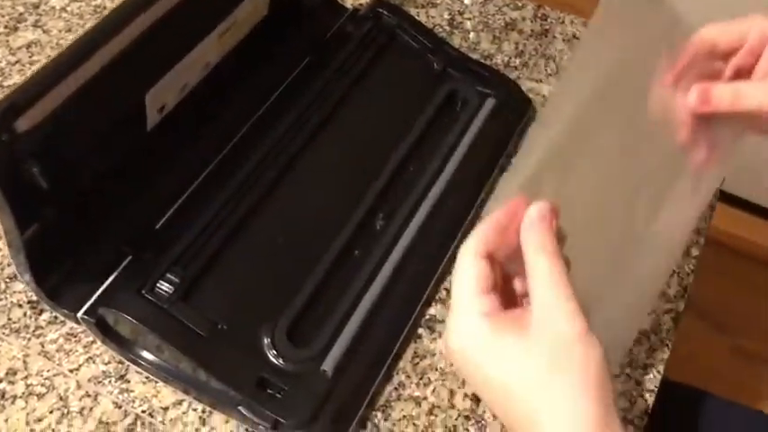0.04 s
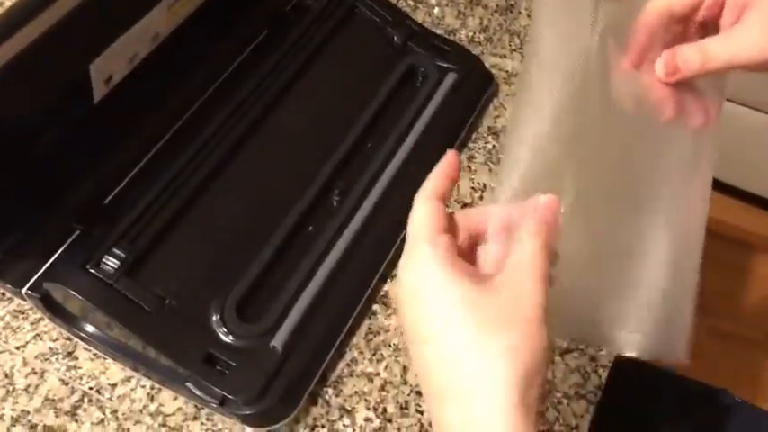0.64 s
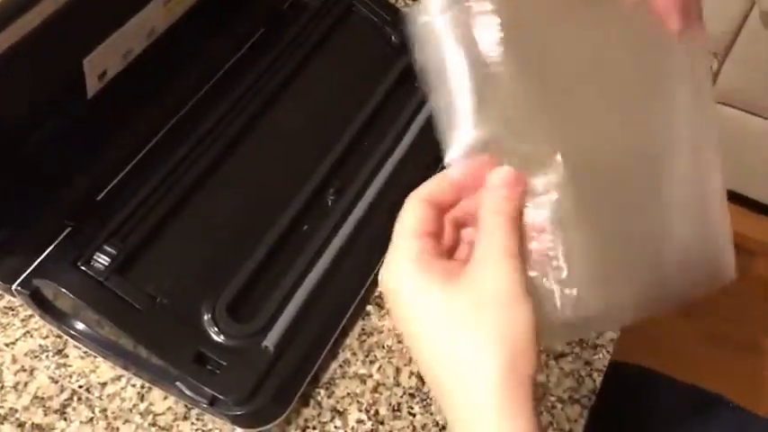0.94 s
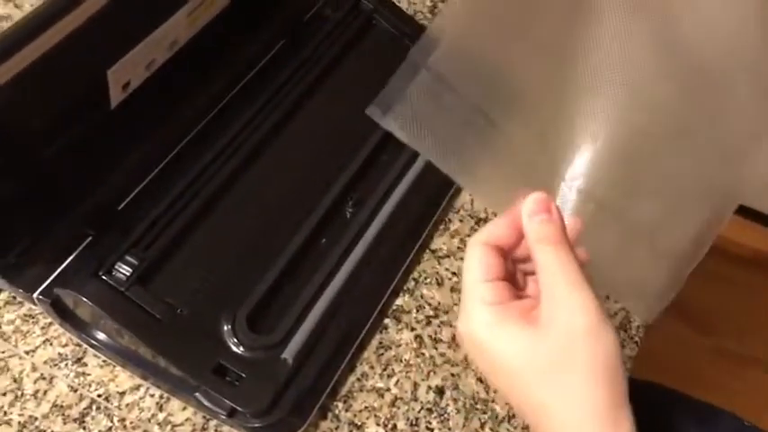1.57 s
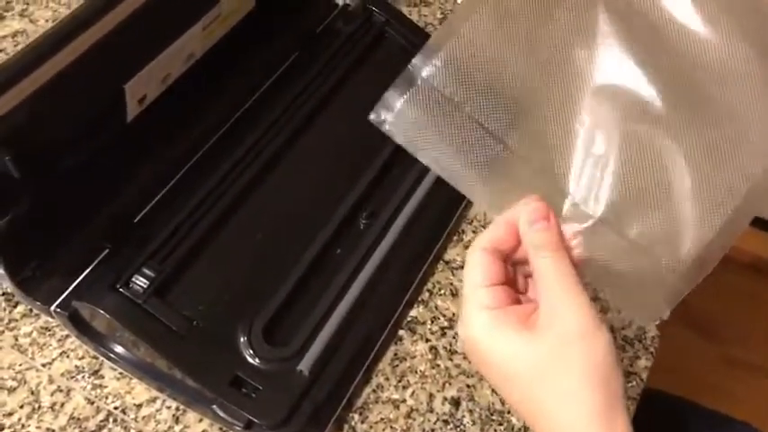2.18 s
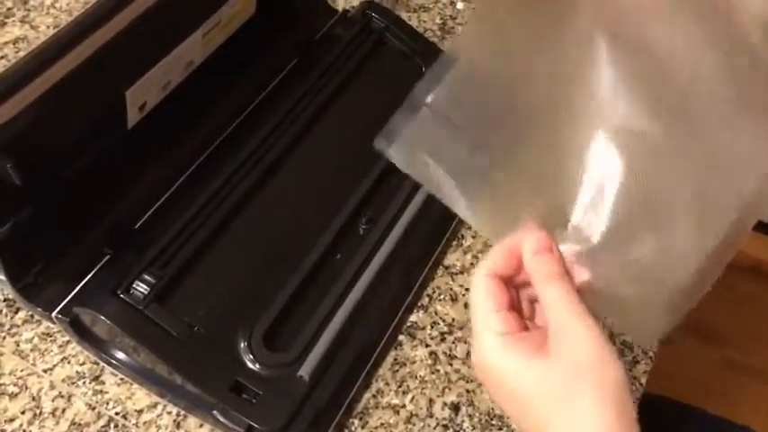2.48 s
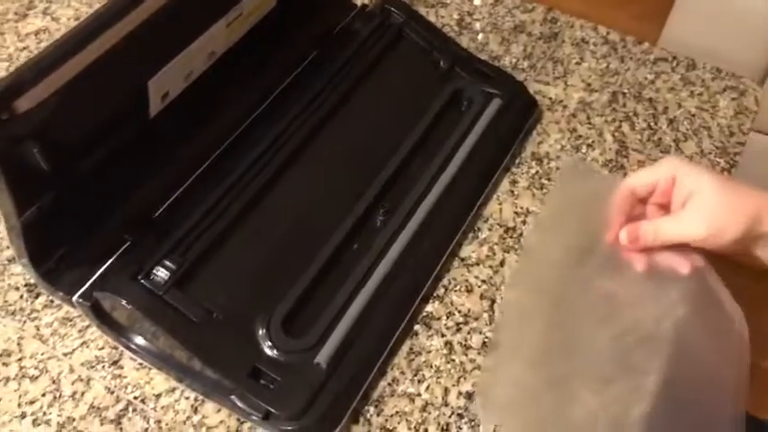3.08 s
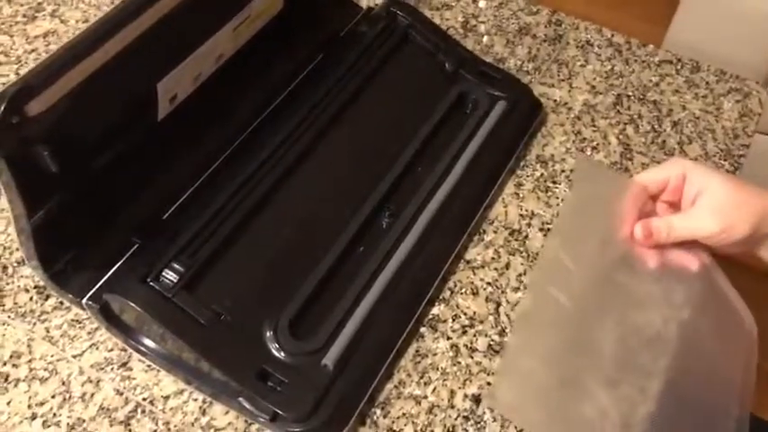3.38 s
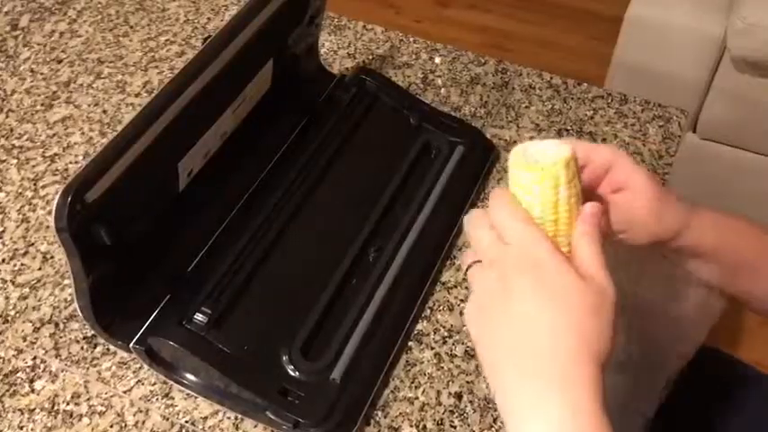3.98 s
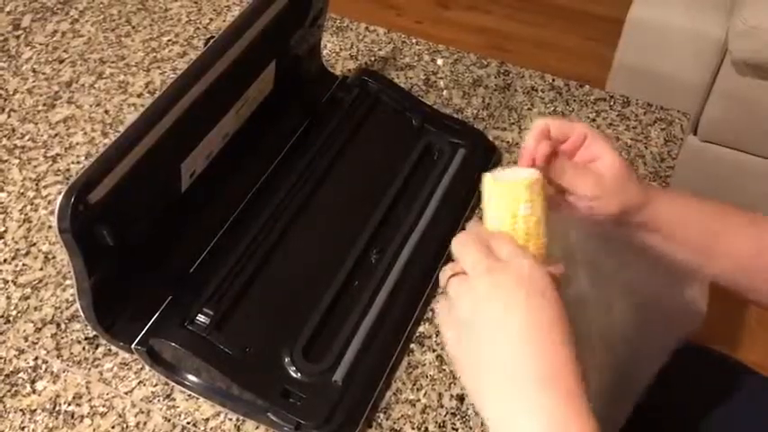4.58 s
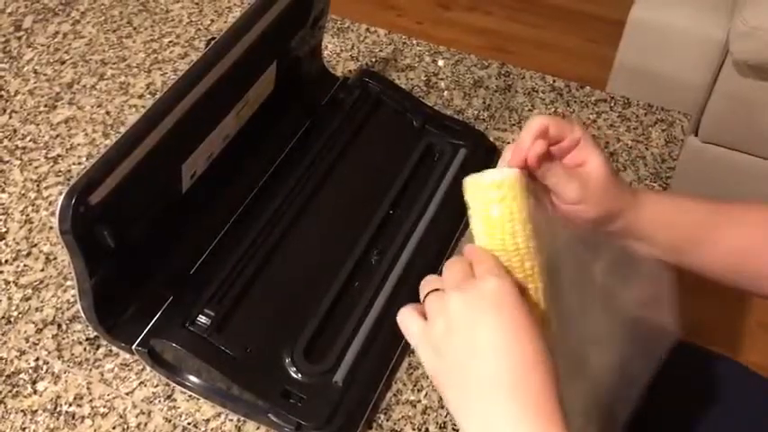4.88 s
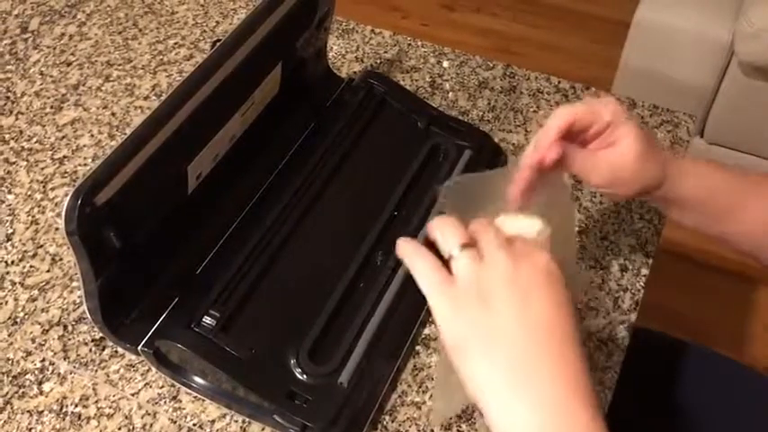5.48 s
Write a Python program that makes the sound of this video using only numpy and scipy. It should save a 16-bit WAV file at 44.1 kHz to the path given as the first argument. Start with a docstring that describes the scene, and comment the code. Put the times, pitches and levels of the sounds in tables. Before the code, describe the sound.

In a small, quiet kitchen, stiff plastic crackles softly nearby as fingers rub and bend a bag. Its creases pop sharply at uneven intervals. The bag drops on the counter with a light slap and a short skid, and there is a moment of faint room noise. Then it is picked up and a corn cob is pushed in, bringing denser rustling, brief scrapes and the loudest snaps near the end.

```python
"""Plastic bag and corn cob

Hands turn and open a stiff plastic bag over a stone kitchen counter, drop it, pick it up and push a
corn cob in. Creases snap through and send short bending waves across the film; between snaps it rubs
and crackles finely. The dropped bag slaps down, skids and flops twice; later the cob scrapes along it.
A small, quiet kitchen rings behind it all."""
import sys
import numpy as np
from scipy import signal
from scipy.fft import rfft, irfft
from scipy.io import wavfile

SR = 44100
rng = np.random.default_rng(int(sys.argv[2]) if len(sys.argv) > 2 else 0)


def dump_mix(stems):
    """Bounce the given channels to the path in sys.argv[1] as a 16-bit WAV at rate SR."""
    frames = np.atleast_2d(stems).T  # one column per channel
    limited = np.clip(frames, -1, 1)  # hard clip at full scale
    pcm = np.round(limited * 32767).astype(np.int16)
    wavfile.write(sys.argv[1], SR, pcm)


N = 244314

# Creases snapping through: t/s, level/dB, f/Hz, roll-off below f and above f/(dB/octave).
# A negative roll-off is a boost.
CREASE_SNAPS = [(.58, -52, 4070, -1.5, -3), (0.86, -52, 1180, -2, 13), (0.947, -45, 556, -3, 7.5),
                (0.9722, -40.5, 3500, 7, 12), (1.1994, -46, 1150, 2, 1.5), (1.227, -42, 4600, 0.5, 36),
                (1.246, -51, 3500, -2, 18), (1.281, -33.5, 9020, 1.6, -6.5), (1.348, -38, 4850, 2.5, 11.5),
                (1.452, -42.5, 6090, 1.5, 15), (1.5552, -41, 2606, 2.5, 1), (1.9169, -41.5, 11200, -2, -30),
                (1.9916, -38, 5940, 2.5, 5), (2.082, -54, 5900, -0.5, 1), (2.145, -43.5, 1180, -2.5, 2.5),
                (2.1613, -45.5, 3100, 6.5, 6), (2.1825, -39.5, 1078, 0.5, 3.5), (2.209, -50, 2400, 2, 5),
                (2.2739, -44, 5500, 0.5, 1.5), (2.2922, -49, 2400, 1.5, 11), (2.31, -46, 4100, -1.5, 9),
                (2.4263, -47, 1750, 3, 10), (2.4668, -41.5, 2600, 3, 5.5), (2.5413, -39.5, 1720, 5.5, 3.5),
                (2.758, -50, 710, 0, 0.5), (2.77, -41, 646, -2, -.5), (2.838, -30, 4600, 1, 6),
                (2.9399, -37, 1710, 3, -2), (3.665, -43, 2944, 2, 10), (3.693, -43, 5400, -1.5, 18),
                (3.8398, -31, 3380, 0.5, 10), (3.9556, -39.5, 2510, 3.5, 8), (4.0804, -42, 2000, 1, -2),
                (4.0868, -41.5, 4070, 6, 18), (4.1225, -41.5, 3670, 7, 1), (4.2539, -46, 3460, 5, 24),
                (4.2844, -44, 4570, 17, 29.5), (4.4266, -30.5, 5470, 8, -2.5), (4.583, -36, 1710, 2, -2.5),
                (4.593, -37.5, 1200, -0.5, 11), (4.6017, -28.5, 5570, 0.5, 16), (4.7083, -28.5, 2100, 5, 0),
                (4.75, -27, 2560, 5, 2.5), (4.9774, -29, 13900, 3.5, 2), (5.0331, -23.3, 2050, 3.5, 1.5),
                (5.0614, -29, 3620, 6, 15), (5.098, -34.5, 1187, 11, 4.5), (5.12, -38.5, 3990, 0.5, 13),
                (5.135, -33.5, 1470, 5, 7), (5.145, -37, 7600, 1, 18.5), (5.202, -47.5, 5420, 3.5, 15),
                (5.3088, -25.5, 1830, 10.5, -2.5), (5.496, -34.5, 2100, -1.5, -3)]
# Overall tone colour shared by snaps and rustle: f/Hz, level/dB
TONE_COLOUR = [(100, -2), (600, -2), (2200, 0), (4200, -3.5), (4900, -5), (5900, -3), (7500, -8),
               (8500, -5.5), (10300, -11.5), (11900, -10.5), (15500, -13.5)]
SNAP_S = .0045  # a snap or tap has the energy of its level held this long
RING_SIZE = 2 ** 11  # samples in one panel's ring
SPURTS_PER_S = 60  # pace of the flutter in the rustle


def snaps(ring_s=0.0022, scatter=0.14, rebound=0.71, rebound_s=0.00092):
    """Creases buckle and ring their panels. Returns the sound straight ahead and the all-round mean."""
    ahead, around = np.zeros((2, N))
    t = np.arange(RING_SIZE) / SR
    for s, db, hz, below, above in CREASE_SNAPS:
        lag_s = rng.uniform(.0006, .0015)
        ring = panel(hz, below, above, lag_s)
        # the wave scatters among wrinkles, longer in large low panels, and an echo off the counter follows just
        # after
        decay_s = ring_s * (2500 / hz) ** 0.052
        kick = scatter * rng.standard_normal(len(t)) * np.exp(-t / decay_s)
        kick[0] += 1
        kick[int((.5 + rng.random()) * rebound_s * SR)] -= rebound
        for out, spectrum in (ahead, ring * rfft(kick)), (around, ring):
            wave = band(irfft(spectrum), 70, 16400)
            add(out, s - lag_s / 2, hit_at_level(wave, db))
    return ahead, around


def panel(hz, below, above, lag_s, tautness=0.73, peak_db=6, peak_octaves=0.38):
    """Spectrum of one buckle: a patch of film rings at hz and its bending waves run out to the edge."""
    f = np.maximum(np.arange(RING_SIZE // 2 + 1) * SR / RING_SIZE, 20)
    octaves = np.log2(f / hz)
    slopes = below * np.minimum(octaves, 0) - above * np.maximum(octaves, 0)
    # a taut panel, thin in the bass, holds a note; a slack one only cracks
    note = np.clip(tautness * below, 0, peak_db) * np.exp(-(octaves / peak_octaves) ** 2)
    # bending waves travel as the root of frequency: treble first, 1 kHz after lag_s
    dispersion = np.exp(-4j * np.pi * lag_s * np.sqrt(f * 1000))
    return dispersion * minimum_phase(curve_db(f, TONE_COLOUR) + slopes + note)


def rustle(hiss=0.64, flicker_db=3.5, slip_db=2.2):
    """Panels flex, wrinkles crackle and the embossed film rubs on skin and on itself."""
    flex_db, crinkle_db, rub_db = handling_levels()
    treble_db = 20 * np.log10(np.hypot(undb(crinkle_db - 7.5), undb(rub_db - 6)))
    # a light touch mostly hisses; a firm grip makes wrinkles pop
    hiss_gain = hiss * undb(-0.25 * (crinkle_db + 33))
    texture = crackle() + hiss_gain * unit(colour(rng.standard_normal(N), TONE_COLOUR))
    texture /= np.hypot(1, hiss_gain)
    # sliding film sizzles at the very top
    sizzle = unit(band(rng.standard_normal(N), 12200, 23800, order=2))
    out = sizzle * undb(rub_db - 1 + slip_db * wander(SPURTS_PER_S))
    for db, lo, hi in [(flex_db, 110, 950), (crinkle_db - 1.13, 900, 5000), (treble_db, 5000, 13500)]:
        edges = np.geomspace(lo, hi, num=4)
        layer = np.zeros(N)
        for a, b in zip(edges, edges[1:]):
            # filtering both ways keeps the bands in step
            forward = band(texture, a, b, order=2)
            strip = band(forward[::-1], a, b, order=2)[::-1]
            layer += strip * undb(flicker_db * wander(SPURTS_PER_S))  # panels change shape and colour
        out += unit(layer) * undb(db)
    return out * undb(slip_db * wander(SPURTS_PER_S))  # fingers catch and slip


def handling_levels(strain_s=0.0025, settle_s=0.0043):
    """Flex, crinkle and rub envelopes in dB: bends, settling creases, crunches and rubs add in power."""
    # A hand bends the bag and its wrinkles crackle: t/s, hold/s, level/dB, flex against crackle/dB
    bends = [(0, 0.094, -73, -7), (0.482, 0.26, -69, -4.5), (0.792, 0.013, -59.5, -1),
             (.925, 0.06, -57, -8.5), (1.105, .28, -58.5, -9.5), (1.9, 0.044, -65, -6),
             (2.123, 0.03, -60.5, -2), (2.25, 0.027, -70, -5), (2.409, 0.21, -62.5, -7.5),
             (3.48, 0.1, -73.5, -3.5), (3.584, 0.035, -56.5, -8.5), (3.66, 0.042, -52, -7.5),
             (3.769, 0.17, -56.5, -14.5), (4.062, 0.14, -50.5, -11.5), (4.254, 0.19, -56, -6),
             (4.51, 0.11, -54, -13.5), (4.629, 0.15, -50.5, -7.5), (4.892, 0.22, -47, -13),
             (5.02, 0.096, -43.5, -6.5), (5.222, 0.38, -54.5, -15.5), (5.48, 0.034, -44.5, -10.5)]
    # A patch of wrinkles collapses in one short crunch: t/s, hold/s, level/dB
    crunches = [(1.936, .007, -47.5), (2.175, 0.011, -45.5), (3.687, 0.0045, -47), (4.078, .008, -44.5),
                (4.121, 0.014, -46.5), (4.589, 0.0086, -39.5), (4.764, 0.0042, -38.5), (5.027, .002, -34.5)]
    # The film slips through the fingers and hisses: t/s, hold/s, level/dB
    rubs = [(.305, 0.028, -60), (.6, 0.12, -64.5), (.797, 0.014, -60), (.83, 0.16, -56),
            (1.14, 0.065, -57.5), (2.24, 0.045, -59), (2.395, 0.046, -60), (2.575, 0.062, -54.5),
            (2.93, .06, -54), (3.586, 0.0066, -61.5), (3.66, 0.084, -57.5), (4.07, 0.11, -61),
            (4.365, 0.033, -51.5), (4.91, 0.2, -49), (5.3, 0.055, -54)]
    flex, crinkle, rub = np.full((3, N), 1e-12)
    for s, held_s, db, flex_db in bends:
        bend = undb(db) * stroke(s, held_s, attack_s=0.024, release_s=0.076)
        crinkle += bend ** 2
        flex += (bend * undb(flex_db)) ** 2
    # wrinkles tighten just before a snap and shake after it
    t = np.arange(-RING_SIZE, 2 * RING_SIZE) / SR
    settle = np.exp(np.minimum(t / strain_s, -t / settle_s))
    for s, db, _, below, _ in CREASE_SNAPS:
        shake = settle * undb(db - 14.5)
        add(crinkle, s + t[0], shake ** 2)
        panel_shake = shake * undb(-2 - 1.25 * below)  # less after a snap that is thin in the bass
        add(flex, s + t[0], panel_shake ** 2)
    for s, held_s, db in crunches:
        crunch = undb(db) * stroke(s, held_s, attack_s=1 / SR, release_s=settle_s)
        crinkle += crunch ** 2
        flex += (crunch * undb(-4.5)) ** 2  # the panels around it flex too
    for s, held_s, db in rubs:
        slip = undb(db) * stroke(s, held_s, attack_s=0.82 * held_s, release_s=0.044)
        rub += slip ** 2
    crinkle += rub * undb(-8) ** 2  # every rub brings some crackle
    return 10 * np.log10([flex, crinkle, rub])


def crackle(per_s=1100, spurt_db=4.6, spread_db=4.2, ceiling_db=14, sizes=20):
    """Tiny buckles come in spurts, mostly weak, a few strong; each wrinkle size has its own pitch."""
    out = np.zeros(N)
    spurts = undb(spurt_db * wander(SPURTS_PER_S))
    for hz in np.geomspace(500, 13000, sizes):
        onsets = rng.choice(N, size=int(per_s / sizes * N / SR), p=spurts / spurts.sum())
        polarity = rng.choice([-1, 1], len(onsets))
        strength_db = np.minimum(spread_db * rng.exponential(size=len(onsets)), ceiling_db)
        buckles = np.zeros(N)
        buckles[onsets] = polarity * undb(strength_db)
        ring = irfft(panel(hz, below=6, above=6, lag_s=.001))
        out += signal.oaconvolve(buckles, ring)[:N]
    return unit(out)


def slides():
    """The film slaps the counter and skids, later slides along the cob; friction rings the panels."""
    # Slides that start with a jerk and come to rest: t/s, level/dB, decay/s, pitch factor
    moves = [(2.9405, -36, 0.014, 1.05), (2.945, -48, 0.095, 0.99), (4.312, -50, 0.021, 0.886),
             (5.497, -35, 0.023, 1.22)]
    # Resonances of the sliding film: f/Hz, width/Hz, level/dB
    modes = [(244, 73, -1.5), (837, 115, 5), (1185, 240, 3.5), (1580, 270, 6), (2090, 98, 4),
             (2430, 160, -1.5), (2910, 170, -3)]
    out, t = np.zeros(N), np.arange(SR) / SR
    for s, level_db, decay_s, pitch in moves:
        friction = rng.standard_normal(len(t))
        ring = sum(undb(db) * band(friction, pitch * hz - width / 2, pitch * hz + width / 2, order=2)
                   for hz, width, db in modes)
        add(out, s, unit(ring) * undb(level_db) * np.exp(-t / decay_s))
    return out


def taps(pitch_hz=1720):
    """A fingertip lands on the slack film: a short, dull scuff."""
    # Soft fingertip touches: t/s, level/dB
    touches = [(0.018, -62), (0.326, -64), (.574, -55.5), (.635, -59), (.718, -64.5), (1.269, -54),
               (2.705, -55.5), (2.798, -53.5), (3.615, -51), (4.165, -45.5)]
    out, t = np.zeros(N), np.arange(RING_SIZE) / SR
    slack_panel = panel(pitch_hz, below=0, above=3.7, lag_s=0)
    for s, db in touches:
        scuff = rng.standard_normal(len(t)) * np.exp(-2 * t / SNAP_S)
        wave = band(irfft(rfft(scuff) * slack_panel), 150, 14800)
        add(out, s - SNAP_S / 2, hit_at_level(wave, db))
    return out


def flops(first_hz=165, last_hz=54, glide_s=0.00558):
    """The bag flops flat and pushes air out: soft puffs that fall in pitch as the sheet settles."""
    # Puffs of air: t/s, level/dB, swell/s
    puffs = [(3.054, -51.5, 0.0075), (3.137, -51.5, 0.013)]
    out, t = np.zeros(N), np.arange(SR) / SR
    hz = last_hz + (first_hz - last_hz) * np.exp(-t / glide_s)
    tone = np.sin(2 * np.pi * np.cumsum(hz) / SR)
    for s, db, swell_s in puffs:
        swell = t / swell_s * np.exp(1 - t / swell_s)
        add(out, s, undb(db) * swell * tone)
    return out


def kitchen(x, t60_s=0.75, treble_t60_s=0.64, split_hz=6000, tail_db=-11,
            echo_db=-19, echo_s=.0098, smear_s=0.0011):
    """A smeared echo off the cupboards and a diffuse tail whose treble dies sooner."""
    t = np.arange(SR) / SR
    low, high, near = rng.standard_normal((3, len(t)))
    body = band(low, 80, split_hz) * undb(-60 * t / t60_s)
    treble = band(high, split_hz, SR / 2) * undb(-1 - 60 * t / treble_t60_s)
    tail = (body + treble) * np.minimum(t / 0.00023, 1)
    echo = near * np.exp(-np.abs(t - echo_s) / smear_s) * (t > echo_s)
    response = undb(tail_db) * tail / np.linalg.norm(tail) + undb(echo_db) * echo / np.linalg.norm(echo)
    return signal.fftconvolve(x, response)[:N]


def room_tone(level_db=-69):
    """The still room: a faint, steady rumble with a trace of hiss."""
    # Colour of the room tone: f/Hz, relative level/dB
    air_colour = [(22, -26), (54, -2.5), (90, -8.5), (220, -12.5), (600, -21), (2500, -25), (9500, -34.5),
                  (13500, -31.5)]
    return unit(colour(rng.standard_normal(N), air_colour)) * undb(level_db)


def undb(db):
    """Decibels to gain."""
    return 10 ** (np.asarray(db) / 20)


def unit(x):
    """Scale to rms 1."""
    return x / np.sqrt(np.mean(x ** 2))


def hit_at_level(wave, db):
    """Give a transient the energy of this level held for SNAP_S."""
    return wave * undb(db) * np.sqrt(SNAP_S * SR) / np.linalg.norm(wave)


def band(x, lo_hz, hi_hz, order=3):
    """Causal band-pass."""
    sos = signal.butter(order, [lo_hz, min(hi_hz, .48 * SR)], "band", fs=SR, output="sos")
    return signal.sosfilt(sos, x)


def curve_db(f, points):
    """Read an EQ curve of (f/Hz, level/dB) points on a log-frequency axis."""
    hz, db = np.transpose(points)
    return np.interp(np.log(np.maximum(f, 1)), np.log(hz), db)


def colour(x, points):
    """Shape a sound with an EQ curve."""
    f = np.arange(len(x) // 2 + 1) * SR / len(x)
    return irfft(rfft(x) * undb(curve_db(f, points)), len(x))


def minimum_phase(db):
    """Spectrum with these levels whose energy comes as early as it can."""
    cepstrum = irfft(np.log(undb(db)))
    cepstrum[1:len(db) - 1] *= 2
    cepstrum[len(db):] = 0
    return np.exp(rfft(cepstrum))


def wander(per_s):
    """Smooth random drift with a spread near 1."""
    knots = rng.standard_normal(4096)
    return np.interp(np.arange(N) / SR * per_s, np.arange(len(knots)), knots)


def stroke(s, held_s, attack_s, release_s):
    """Envelope of one move: it rises from time s and starts to die away held_s later."""
    t = np.arange(N) / SR - s
    return np.clip(t / attack_s, 0, 1) * np.exp(-np.maximum(t - held_s, 0) / release_s)


def add(out, s, sound):
    """Mix a sound in at time s."""
    i = max(int(s * SR), 0)
    out[i:i + len(sound)] += sound[:N - i]


def scene():
    """The bag close by, its reverb and the still room, in mono."""
    ahead, around = snaps()
    handling = rustle() + taps() + slides() + flops()
    air = room_tone()
    return (ahead + handling + kitchen(around + handling) + air)[None]


def record(dry):
    """A steep low-pass takes off the top above 15.5 kHz."""
    return signal.sosfilt(signal.ellip(10, .2, 70, 15500, fs=SR, output="sos"), dry)


dry = scene()
out = record(dry)
dump_mix(out)
```